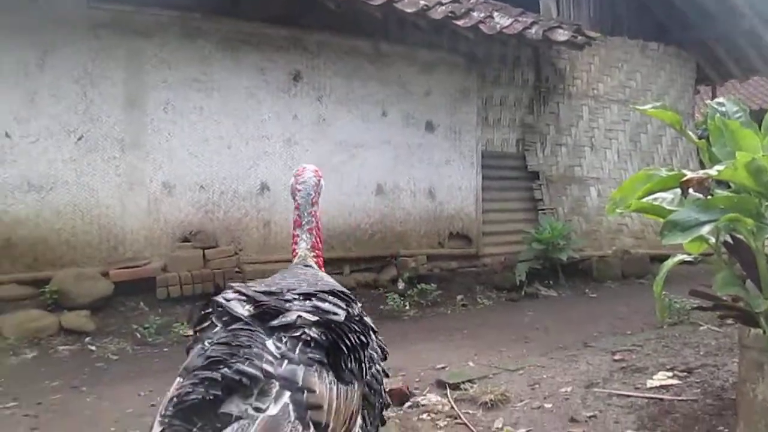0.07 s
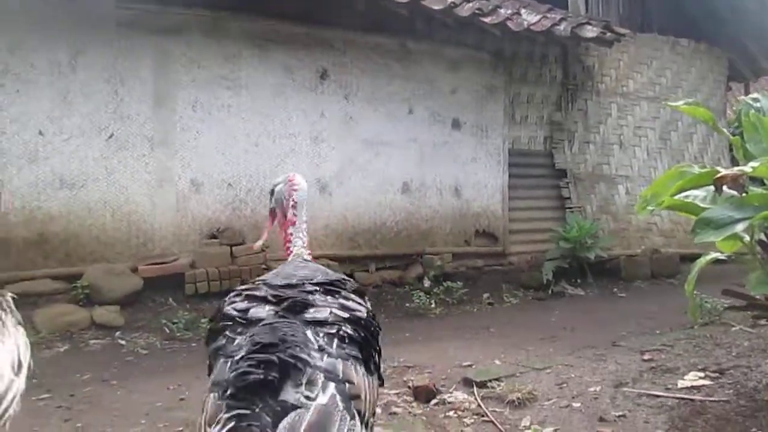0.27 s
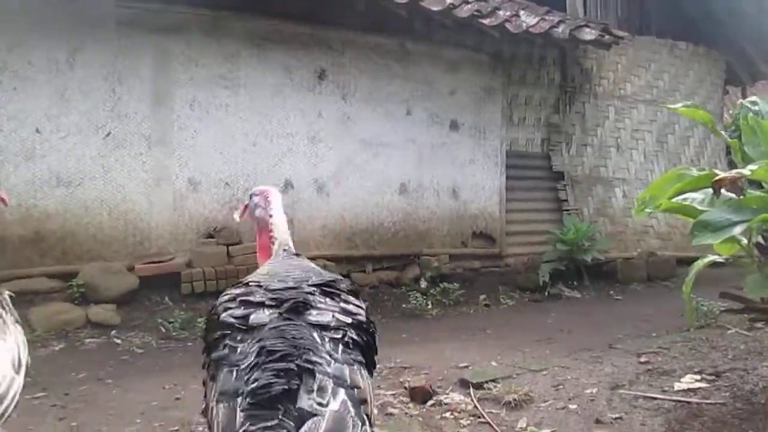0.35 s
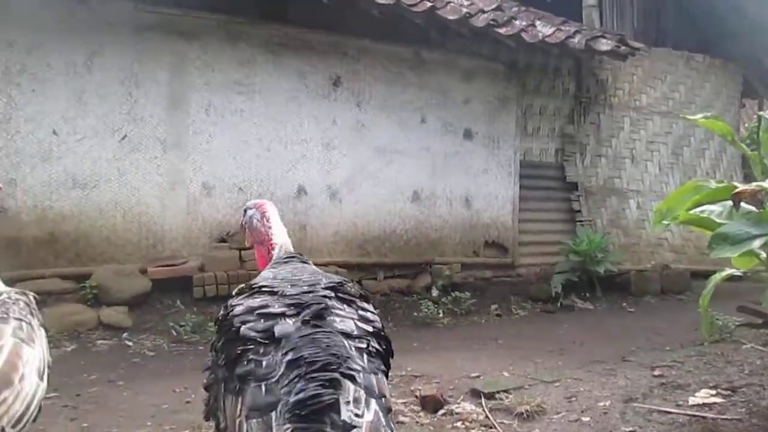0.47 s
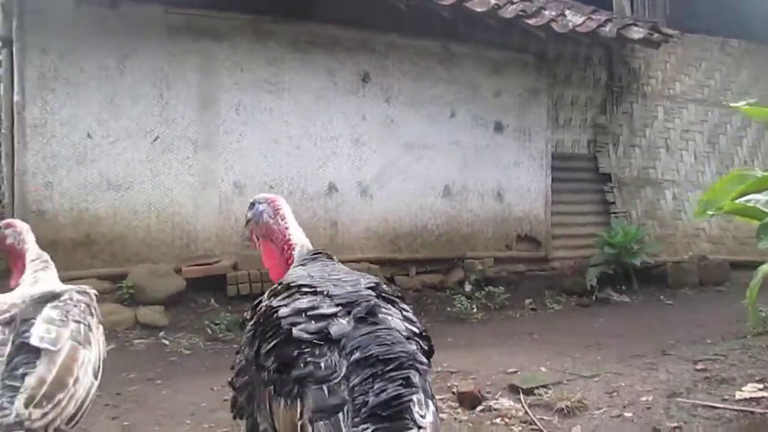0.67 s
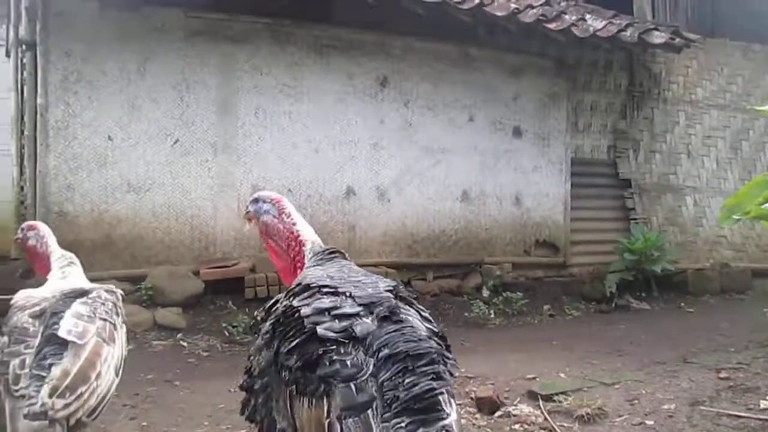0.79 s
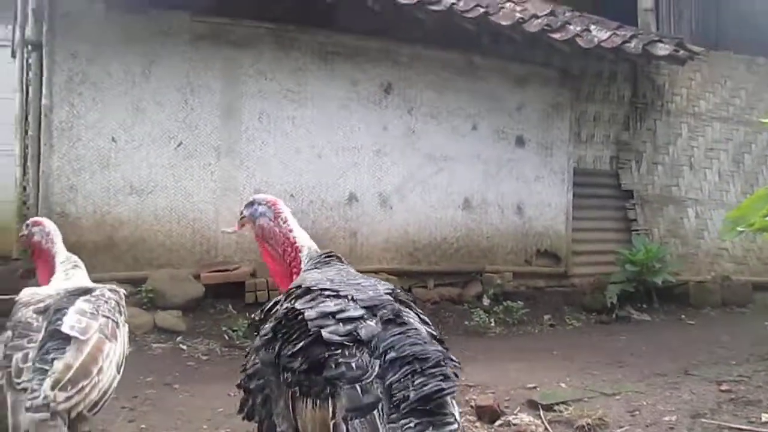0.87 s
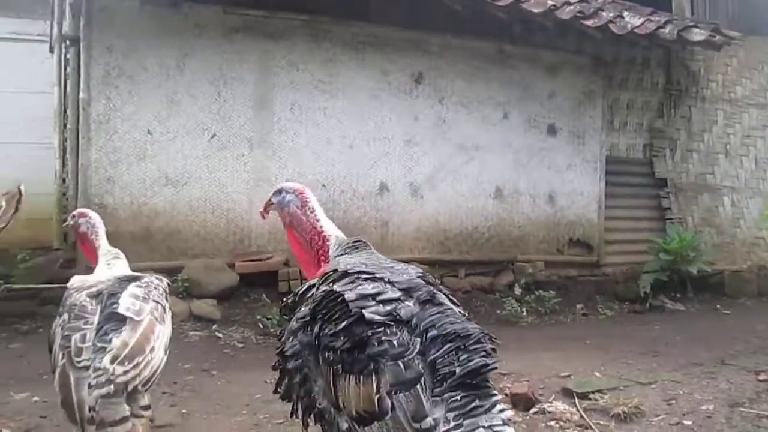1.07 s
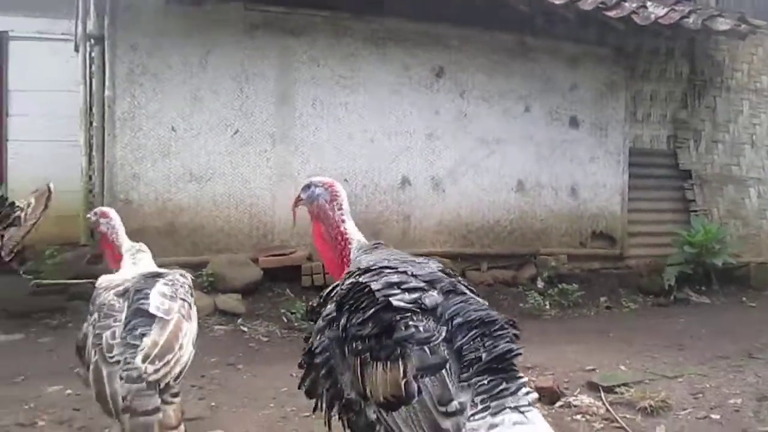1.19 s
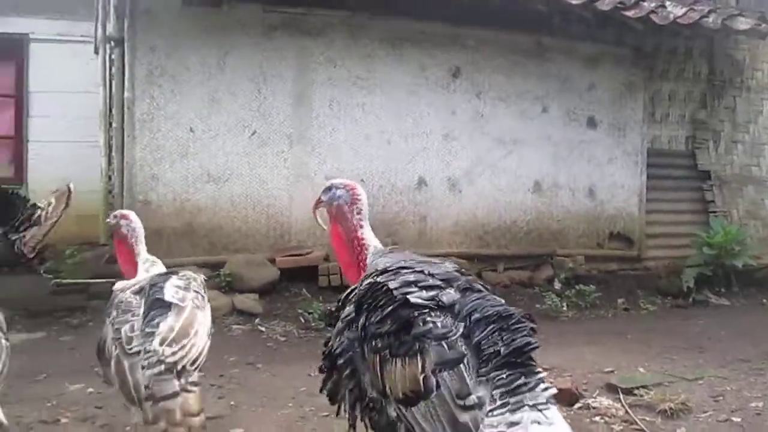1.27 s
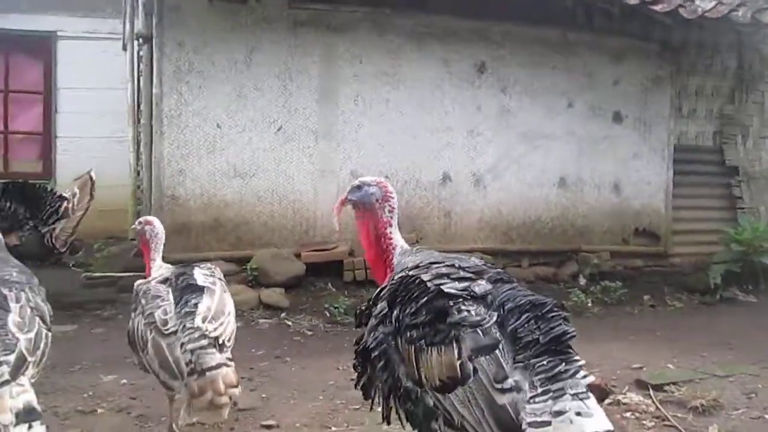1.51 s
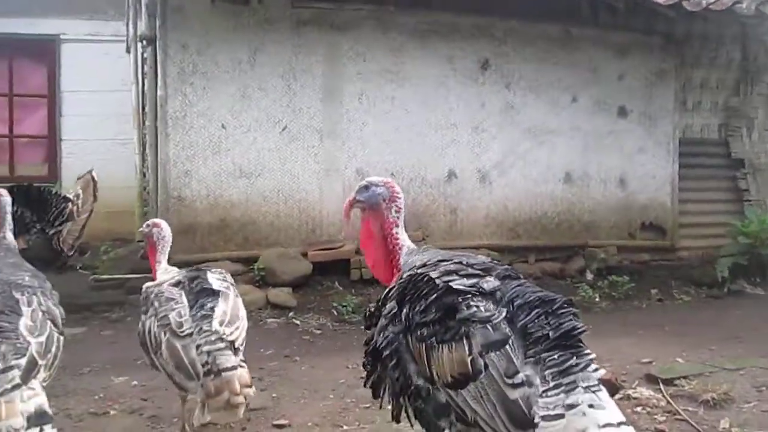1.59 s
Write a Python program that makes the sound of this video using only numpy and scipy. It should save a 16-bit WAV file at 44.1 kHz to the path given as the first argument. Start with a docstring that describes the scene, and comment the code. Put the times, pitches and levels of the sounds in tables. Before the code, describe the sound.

Close to the microphone, a turkey lets out one gobble, opening with two sharp yelps and breaking into a fast, rattling warble that sinks away. Behind it is the soft hush and low rumble of an outdoor yard.

```python
"""A turkey gobbling in a farmyard

A male turkey gives two clean yelps, then a tumble of short, overlapping notes that sink and fade. The two sides
of his voice box sound at different pitches over a hoarse, unevenly shaking warble, with thin whistles and puffs
of hiss. The ground and walls throw the call back. Behind it are a far-off cluck, a low rumble of air and the
faint murmur of the yard."""
import sys
import numpy as np
from scipy import signal
from scipy.fft import rfft, irfft, next_fast_len
from scipy.io import wavfile
from scipy.ndimage import uniform_filter1d, minimum_filter1d, map_coordinates

SR = 44100
rng = np.random.default_rng(int(sys.argv[2]) if len(sys.argv) > 2 else 0)


def int16_out(signal):
    """Quantize to a 16-bit WAV file."""
    q = np.round(np.clip(np.atleast_2d(signal).T, -1, 1) * 32767)
    wavfile.write(sys.argv[1], SR, q.astype(np.int16))


N = 72765
ATTACK_S, RELEASE_S = .005, .0092  # how quickly a note starts and stops
JITTER_HZ, FLUTTER_HZ = 448.9, 265.1  # how fast pitch (jitter) and loudness (flutter) tremble
TOP_HZ = 15700  # highest frequency kept


def amp(db):
    """Turn decibels into a number to multiply by."""
    return 10 ** (np.asarray(db) / 20)


def unit(x):
    """Scale a signal to an average strength (rms) of 1."""
    return x / np.sqrt(np.mean(x ** 2) + 1e-20)


def along(points, hz):
    """Read between (f/Hz, value) points, with octaves evenly spaced."""
    f, v = np.transpose(points)
    return np.interp(np.log(hz + 1), np.log(f + 1), v)


def curve(rows):
    """Join (t/s, value) points with straight lines, one value per sample."""
    return np.interp(np.arange(N) / SR, *np.transpose(rows))


def wobble(rate):
    """A smooth curve through `rate` random values a second."""
    return map_coordinates(rng.standard_normal(4096), [np.arange(N) * rate / SR], mode="wrap")


def filtered(x, response):
    """Multiply each frequency in x by response(hz)."""
    size = next_fast_len(N + 8192)
    return irfft(rfft(x, size) * response(np.fft.rfftfreq(size, 1 / SR)), size)[:N]


def noise(spectrum):
    """Noise of strength 1, shaped by (f/Hz, level/dB) points."""
    return unit(filtered(rng.standard_normal(N), lambda hz: amp(along(spectrum, hz))))


def patchy(hiss, depth_db=7):
    """Break a hiss into brief, narrow flecks at random pitches."""
    cells = signal.stft(hiss, nperseg=512)[2]
    flecks = uniform_filter1d(rng.standard_normal(cells.shape), size=3, axis=0)
    flecks = unit(uniform_filter1d(flecks, size=4, axis=1))
    return unit(signal.istft(cells * amp(depth_db * flecks), nperseg=512)[1][:N])


def note(start, length):
    """A note's sample positions, its progress from 0 to 1, and its soft rise and fall."""
    first = max(0, int((start - 2 * ATTACK_S) * SR))
    last = min(N, int((start + length + 2 * RELEASE_S) * SR))
    at = np.arange(first, last)
    t = at / SR - start
    rise = (1 + np.tanh(2 * t / ATTACK_S - 1)) / 2
    fall = (1 + np.tanh(2 * (length - t) / RELEASE_S - .5)) / 2
    return at, np.clip(t / length, 0, 1), rise * fall


def yard(level_db=-46, fade_db_per_s=1.5):
    """The even hush of the yard, slowly fading."""
    # tone of the hush: f/Hz, level/dB
    spectrum = [(25, -29), (50, -10.5), (80, -20.5), (125, -4.5), (200, -3), (350, -4), (520, -0.5),
                (900, -4), (1600, -10), (3000, -16.5), (5000, -22.5), (10000, -33.5), (15500, -44.5)]
    from_middle_s = (np.arange(N) - N / 2) / SR
    return noise(spectrum) * amp(level_db - fade_db_per_s * from_middle_s)


def rumble():
    """A low rumble of air that swells and sinks."""
    # tone of the rumble: f/Hz, level/dB
    spectrum = [(25, -18), (55, -18), (80, 5.5), (110, -3.5), (200, -19.5), (500, -57), (2000, -120)]
    # its loudness: t/s, level/dB
    levels = [(0, -64.5), (.2, -53.5), (.5, -58.5), (.9, -58.5), (1.27, -53), (1.45, -65), (1.65, -61)]
    return noise(spectrum) * amp(curve(levels))


def cluck(start_s=.006, level_db=-29.5, fade_s=.22, dull_hz=2500):
    """A distant bird's short, dull note, smeared by the yard."""
    # pitches that ring in the cluck: f/Hz, width/Hz, level/dB
    resonances = [(670, 60, -7), (801, 52, -4.5), (952, 13, 6.5), (1153, 120, -8.5)]

    def response(hz):
        peaks = sum(amp(db) * 1j * hz * width / (centre ** 2 - hz ** 2 + 1j * hz * width)
                    for centre, width, db in resonances)
        return peaks / (1 + (hz / dull_hz) ** 2)

    t = np.maximum(np.arange(N) / SR - start_s, 0)
    ring = unit(filtered(rng.standard_normal(N), response))
    return ring * amp(level_db - 60 * t / fade_s) * (1 - np.exp(-t / ATTACK_S))


def echoes(call, tail_db=-11, build_s=.0044):
    """The call bounces off the ground and walls, then blurs into a short tail."""
    # separate bounces: delay/s, level/dB
    bounces = [(.0125, -10.5), (.019, -14), (.043, -17), (.058, -29)]
    # how long the tail takes to fall by 60 dB: f/Hz, t/s
    fade_times = [(200, 0.1), (1000, 0.44), (4000, 0.61), (12000, 0.64)]
    hz, t, cells = signal.stft(rng.standard_normal(SR // 2), SR, nperseg=256)
    fade = amp(-60 * t / along(fade_times, hz)[:, None])
    tail = signal.istft(cells * fade * (1 - np.exp(-t / build_s)), SR, nperseg=256)[1]
    walls = filtered(call, lambda f: sum(amp(db) * np.exp(-2j * np.pi * f * s) for s, db in bounces))
    return walls + amp(tail_db) * signal.fftconvolve(call, tail / np.linalg.norm(tail))[:N]


def beak_puffs():
    """Short puffs of hiss from the open beak as the hardest notes are forced out."""
    # puffs: start/s, length/s, level/dB
    puffs = [(.280, 0.042, -43.5), (0.463, .020, -48), (0.631, 0.034, -51.5), (0.726, .042, -46),
             (0.956, .035, -50.5), (1.167, 0.03, -54.5)]
    # tone of the hiss: f/Hz, level/dB
    spectrum = [(1200, -22), (2500, 10), (4200, -9.5), (6000, 2.5), (8000, -2), (12000, -16),
                (15500, -25.5)]
    out, hiss = np.zeros(N), patchy(noise(spectrum))
    for start, length, db in puffs:
        at, _, swell = note(start, length)
        out[at] += swell * amp(db) * hiss[at]
    return out


def squeaks(jitter_depth=.014, flutter_db=3.5):
    """Thin, slightly unsteady gliding whistles that flash up in the throat."""
    # whistles: start/s, length/s, first pitch/Hz, last pitch/Hz, level/dB
    whistles = [ (0.352, .022, 4410, 3860, -36), (.398, 0.031, 5630, 5100, -45.5),
                (.401, 0.016, 2730, 2560, -34.5), (0.44, 0.01, 4350, 3840, -30.5),
                (0.491, 0.016, 3335, 3390, -23.5), (.493, .042, 2572, 2580, -26.5),
                (0.572, 0.029, 6140, 5470, -48), (0.618, 0.022, 6200, 5650, -44),
                (0.64, 0.034, 3080, 2860, -32.5), (.665, 0.054, 2262, 2160, -33),
                (0.808, 0.0092, 3620, 3700, -36), (0.839, 0.01, 2780, 2820, -32),
                (0.934, 0.03, 2000, 2310, -27.5), (1.011, 0.0089, 2620, 2700, -32.5),
                (1.067, 0.012, 3300, 3100, -34.5), (1.071, 0.0093, 2410, 2340, -30),
                (1.174, 0.045, 2035, 2017, -33.5), (1.166, 0.098, 3190, 3090, -45),
                (1.253, 0.021, 2350, 2400, -56), (1.275, 0.039, 1890, 1828, -42),
                (1.299, 0.018, 5300, 5330, -51)]
    out, jitter, flutter = np.zeros(N), wobble(JITTER_HZ), wobble(FLUTTER_HZ)
    for start, length, first, last, db in whistles:
        at, progress, swell = note(start, length)
        pitch = (first + (last - first) * progress) * (1 + jitter_depth * jitter[at])
        tone = np.sqrt(2) * np.sin(2 * np.pi * np.cumsum(pitch) / SR)
        out[at] += swell * amp(db + flutter_db * flutter[at]) * tone
    return out


def unsteadiness():
    """Five random signals for a voice: one pitch jitter, three loudness flutters and breath noise."""
    # tone of the breath: f/Hz, level/dB
    spectrum = [(300, -43), (550, -24), (900, 0), (1400, 3.5), (3000, 7), (4200, -6), (5000, -6.5),
                (6000, -28.5), (7500, -16), (10500, -22), (15000, -39)]
    jitter = wobble(JITTER_HZ)
    flutters = [wobble(FLUTTER_HZ) for _ in range(3)]
    return np.array([jitter, *flutters, patchy(noise(spectrum))])


def voice_box(pitch, base_db, octave_db, top_db, rough, unrest):
    """A vibrating membrane: a base tone, its octave, higher overtones and a puff of air each cycle."""
    # how the throat shapes the overtones: f/Hz, level/dB
    throat = [(1400, 7), (2100, 7), (2800, -2), (3500, 0), (4300, -7.5), (5000, -14.5), (5800, -11),
              (7500, -40), (10000, -36.5), (15000, -58.5)]
    # strength of the half-pitch tone, mostly in low notes: pitch/Hz, level/dB
    half_levels = [(460, 4), (520, -23), (590, 0.5), (680, -19)]
    jitter_depth, flutter_db = .06, 6.5  # for a fully rough note
    scatter_db, drift_hz = 6, 40.06  # how far and how fast each overtone wanders
    rasp_db, half_db, fifth_db = -8, -15, -5
    jitter, *flutters, breath = unrest
    phase = 2 * np.pi * np.cumsum(pitch * (1 + jitter_depth * rough * jitter)) / SR
    base_gain, octave_gain, top_gain = [
        unit(amp(flutter_db * rough * 2 * np.tanh(flutter / 2))) for flutter in flutters]

    multiples = np.arange(3, 22)[:, None]
    steps = np.arange(len(pitch)) * drift_hz / SR
    targets = rng.standard_normal((len(multiples), 256))
    drift = np.array([np.interp(steps, np.arange(256), row) for row in targets])
    overtone_hz = multiples * pitch
    gains = amp(along(throat, overtone_hz) + scatter_db * drift) * (overtone_hz < TOP_HZ)
    overtones = unit(np.sum(gains * np.cos(multiples * phase + 2 * drift[::-1]), axis=0))
    rasp = amp(rasp_db) * breath * (1 + np.cos(phase))

    # a rough note repeats only every second cycle, adding tones at 0.5 and 1.5 times its pitch
    half = amp(half_db + along(half_levels, pitch)) * np.cos(phase / 2)
    fifth = amp(fifth_db) * top_gain * np.cos(1.5 * phase)
    base = amp(base_db) * (base_gain * np.cos(phase) + rough * (half + fifth))
    octave = amp(octave_db) * octave_gain * np.cos(2 * phase)
    return np.sqrt(2) * (base + octave) + amp(top_db) * top_gain * (overtones + rasp)


def rattle(typical_shake_hz=32, bend=.0627, swing_db=1.5):
    """A hoarse warble under the notes, shaking unevenly in pitch and strength."""
    # its sinking pitch: t/s, f/Hz
    pitches = [(.3, 759.6), (.7, 659.3), (1.0, 588.3), (1.3, 550)]
    # its loudness: t/s, level/dB
    levels = [(.2, -57), (.33, -60.5), (.44, -22), (.51, -23.5), (.57, -46), (.66, -19), (.76, -34.5),
              (.86, -20), (.96, -24), (1.06, -37.5), (1.11, -34.5), (1.19, -26.5), (1.27, -42.5),
              (1.37, -48.5), (1.45, -57)]
    shake_hz = typical_shake_hz * amp(2 * wobble(20))
    shake = np.sin(2 * np.pi * np.cumsum(shake_hz) / SR)
    pitch = curve(pitches) * (1 + bend * shake)
    voice = voice_box(pitch, base_db=0, octave_db=6, top_db=-8, rough=.9, unrest=unsteadiness())
    return unit(voice) * amp(curve(levels) + swing_db * shake)


def yelp():
    """The long second yelp swoops up and back: the octave leads going up, the base tone at the top."""
    # one unbroken arch: t/s, pitch/Hz, base tone/dB, octave/dB, overtones/dB, roughness/0-1
    arch = [ (.257, 703.3, -21, -39.5, -59, 0.02), (0.269, 711, -20, -24, -43.5, 0.17),
            (.276, 744, -12, -5.5, -30, 0.11), (0.287, 811.6, -9, -22.5, -26.5, 0.2),
            (.299, 927, -9, -29, -29.5, 0.22), (0.31, 899.4, -7.5, -31.5, -35, 0),
            (0.322, 854, -18.5, -24, -36, 0.13), (0.331, 749, -9, -43, -34.5, 0.02),
            (0.341, 729, -18.5, -38, -41, 0.3)]
    times, *columns = np.transpose(arch)
    at, _, swell = note(times[0], times[-1] - times[0])
    pitch, base_db, octave_db, top_db, rough = [np.interp(at / SR, times, c) for c in columns]
    out = np.zeros(N)
    out[at] = swell * voice_box(pitch, base_db, octave_db, top_db, rough, unsteadiness()[:, at])
    return out


def gobble():
    """The first yelp and the tumble of notes; the two sides of the voice box take turns."""
    # notes: start/s, length/s, first pitch/Hz, middle pitch/Hz, last pitch/Hz,
    # base tone/dB, octave/dB, overtones/dB, roughness/0-1
    notes = [ (.195, 0.02, 873, 916, 920, -29, -53, -45.5, 0.2),
             (.212, 0.018, 716, 696.6, 653, -10.5, -7, -21, 0.08),
             (.361, 0.0232, 724, 648, 610, -25.5, -21, -32.5, 0.1),
             (.409, 0.011, 740, 709, 640, -35, -17, -28.5, 0.4),
             (.420, 0.007, 722, 747, 680, -11.5, -20.5, -21, 0.2),
             (.447, 0.017, 635.7, 644.4, 653, -30.5, -14, -25.5, 0.18),
             (.459, .028, 659, 661.8, 648, -26, -9.5, -21.5, 0.05),
             (.488, 0.0546, 835, 863.2, 854, -21, -18.5, -26, 0.1),
             (.487, 0.0414, 666.4, 659.7, 618, -20.5, -45, -25.5, 0.2),
             (.533, 0.016, 798.5, 775, 700, -13, -47, -26.5, 0.4),
             (.585, 0.0091, 664, 661, 676, -30, -15.5, -23, 0.5),
             (.596, 0.0072, 701, 704, 640, -9.5, -13, -21.5, 0.3),
             (.605, 0.015, 696.4, 677, 665, -42, -22, -32, 0),
             (.627, 0.022, 702, 670, 676, -27, -19, -26, 0.8),
             (.638, 0.0906, 777, 738.7, 709, -21.5, -28.5, -29, 0.08),
             (.658, 0.0097, 663.6, 643, 583, -26, -7, -26, 0.65),
             (.725, 0.03, 595.5, 588, 598, -13.5, -16.5, -34, 0.37),
             (.761, 0.019, 599, 571.5, 603, -53, -11.5, -31, 0.2),
             (.742, .038, 719.5, 691.4, 702, -19, -26, -35.5, 0.4),
             (.789, 0.029, 701, 680.6, 660, -18, -33, -37, 0.3),
             (.813, 0.018, 739, 712, 680, -28.5, -26, -33.5, .5),
             (.835, 0.01, 611, 566.6, 626, -22, -11, -22.5, 0.07),
             (.852, 0.058, 616.6, 637.3, 667, -30.5, -17.5, -40.5, 0.09),
             (.905, 0.077, 699, 707.3, 670, -22.5, -48, -53, 0.4),
             (.910, 0.066, 462, 457.3, 476, -32.5, -47, -44, 0.7),
             (.932, 0.056, 658, 754, 743, -30, -26.5, -33, .2),
             (.945, 0.025, 637.5, 593.4, 552, -24, -35, -31, 0.2),
             (.990, 0.025, 573.3, 568.3, 639, -25.5, -30, -37, 0.2),
             (1.006, 0.017, 668.6, 673, 655, -18.5, -31.5, -30.5, 0.42),
             (1.027, 0.0089, 552.6, 528, 545, -27.5, -22, -35, 0),
             (1.072, .040, 579.8, 551.4, 557, -66, -35, -38.5, .5),
             (1.120, 0.031, 468, 468.6, 443, -32, -31, -43, 1),
             (1.166, 0.03, 523.5, 498.4, 504, -32, -22.5, -35, 0.2),
             (1.181, 0.051, 683, 670.5, 647, -22.5, -35.5, -43, 0.2),
             (1.210, 0.032, 553.6, 595, 620, -23.5, -57, -45, 0.06),
             (1.243, 0.032, 572.5, 550.3, 562, -41, -32.5, -41, 0.5),
             (1.280, 0.0334, 624.7, 608.3, 608, -44, -42, -44, 0.35)]
    out, sides = np.zeros(N), [unsteadiness(), unsteadiness()]
    for i, (start, length, first, middle, last, base_db, octave_db, top_db, rough) in enumerate(notes):
        at, u, swell = note(start, length)
        # a smooth bend through the three pitches as u goes from 0 to 1
        pitch = first * (1 - u) * (1 - 2 * u) + middle * (1 - (2 * u - 1) ** 2) + last * u * (2 * u - 1)
        out[at] += swell * voice_box(pitch, base_db, octave_db, top_db, rough, sides[i % 2][:, at])
    return out


def scene():
    """The turkey's call with its low tones shaped, its echoes, a far cluck and the hush of the yard."""
    # deep bass thinned, a lift near 280 Hz and a dip around 350-480 Hz: f/Hz, level/dB
    low_tone_shape = [(100, -16.5), (200, -7), (280, 4), (350, -20), (480, -6.5), (600, -1)]
    call = yelp() + gobble() + rattle() + squeaks() + beak_puffs()
    turkey = filtered(call, lambda hz: amp(along(low_tone_shape, hz)))
    background = yard() + rumble()
    return (background + turkey + echoes(turkey) + cluck())[None]


def record(dry):
    """A limiter turns the loudest peaks down, and the highest treble is cut off."""
    limit_db, hold_s = -1.2, .004
    hold = int(hold_s * SR)
    needed = np.minimum(1, amp(limit_db) / (np.abs(dry[0]) + 1e-9))
    gain = uniform_filter1d(minimum_filter1d(needed, size=2 * hold), size=hold)
    return filtered(dry[0] * gain, lambda hz: hz < TOP_HZ)[None]


dry = scene()
out = record(dry)
int16_out(out)
```